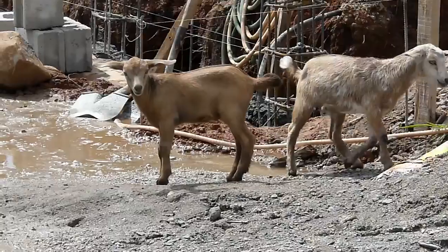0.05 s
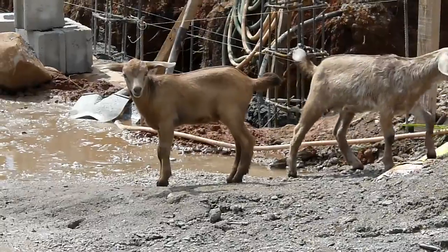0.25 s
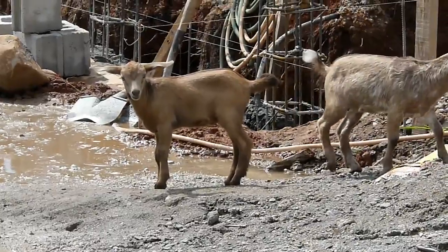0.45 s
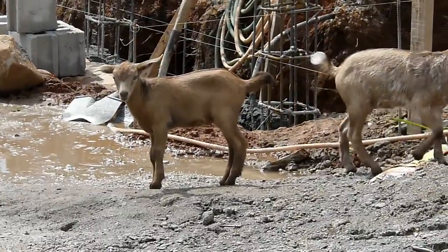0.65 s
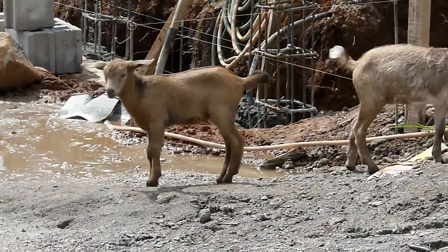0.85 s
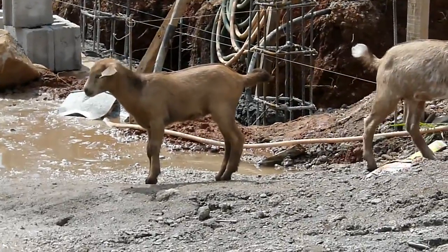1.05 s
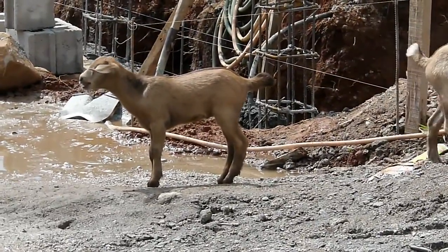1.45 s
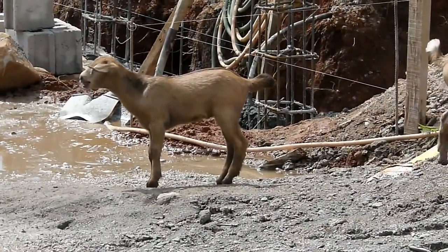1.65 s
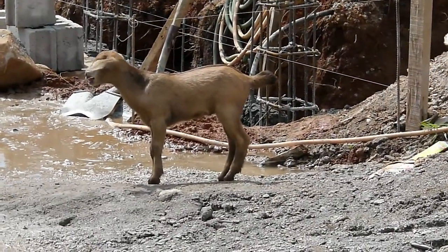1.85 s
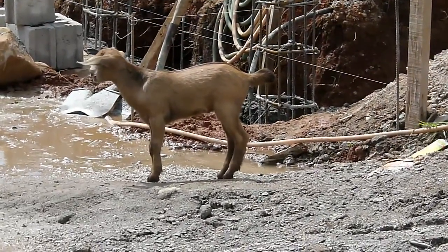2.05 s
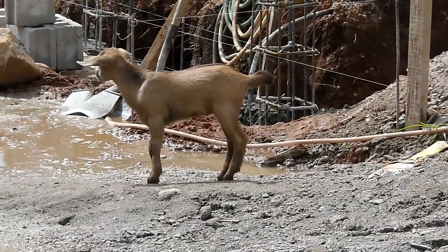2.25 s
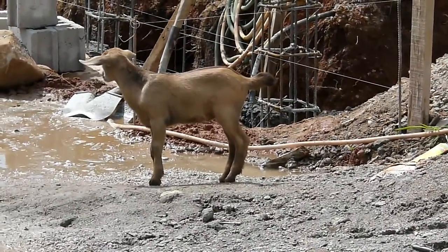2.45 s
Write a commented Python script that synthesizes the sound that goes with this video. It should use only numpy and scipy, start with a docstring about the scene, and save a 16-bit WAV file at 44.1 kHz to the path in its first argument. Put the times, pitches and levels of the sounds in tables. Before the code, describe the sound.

A young goat gives one high, quavering bleat from about 1.3 to 2.2 seconds, slightly left, with a short echo and a falling end. Earlier, metal squeals faintly until 0.5 seconds, and a small distant engine putters, peaking near 0.8 seconds, then fading. Hooves crunch softly on gravel around 1 second. Faint machine whines, building site din and hiss lie underneath, with light wind bumping the microphone.

```python
"""A building site. A young goat gives one quavering bleat: vocal-fold harmonics and rasp through
throat formants, in short pitch arches, about ten a second, thrown back by a wall to the left.
A small engine some way off putters with exhaust pulses and fades. Rubbing metal squeals and dies away,
machines whine faintly and a second goat's hooves crunch on gravel.
Light wind bumps against the microphone over machine din and hiss."""
import sys
import numpy as np
from scipy import signal
from scipy.fft import rfft, irfft, next_fast_len
from scipy.io import wavfile
from scipy.ndimage import map_coordinates

SR = 44100
rng = np.random.default_rng(int(sys.argv[2]) if len(sys.argv) > 2 else 0)


def to_wav(s):
    """Save 16-bit WAV."""
    ch = np.atleast_2d(s).T  # columns
    pcm = np.round(np.clip(ch, -1, 1) * 32767)  # PCM
    wavfile.write(sys.argv[1], SR, pcm.astype(np.int16))


N = 110250
START_S = .169

# Bleat arches. Each row: crest time in seconds, pitch in Hz, climb as a share of pitch, rise and fall
# in seconds, level in dB, six formant settings as in LAST_FORMANTS, rasp in dB.
SYLLABLES = [(1.324, 599, 0.0049, .024, 0.015, -50.5, 3380, 7.5, -8, -13, 8000, 0, -27),
             (1.432, 615.3, 0.056, 0.031, 0.015, -39, 3600, 10.5, -6.5, -5, 8150, 11, -11),
             (1.520, 632.4, 0.059, 0.038, .02, -38, 3570, 16.5, -2.5, -2.5, 8400, 9, -14.5),
             (1.611, 637, 0.05, .034, 0.021, -39.5, 3550, 18.5, 9, 0.5, 9300, 2.5, -21),
             (1.705, 643, .037, .042, 0.017, -38, 3540, 18, 9, 2.5, 11600, 7, -15.5),
             (1.796, 646.5, .03, .043, .015, -39.5, 3610, 17.5, 7, -2, 9600, 1, -18.5),
             (1.883, 648.5, 0.006, .036, 0.014, -42.5, 3610, 22, 10, 0.5, 9600, 1, -30),
             (1.981, 648.2, 0.0065, 0.043, 0.018, -42, 3630, 24.5, 10.5, 3, 11200, 3, -36),
             (2.075, 641.8, 0.0123, 0.047, 0.021, -42.5, 4170, 14.5, 3, -0.5, 6760, 1, -32)]
# Falling last syllable. Each row: time in seconds, pitch in Hz, level in dB.
LAST_SYLLABLE = [(2.128, 608, -66), (2.148, 620, -46), (2.165, 597, -43), (2.177, 562, -44.5),
                 (2.19, 520, -58)]
# In order: main formant in Hz, its gain in dB, upper formant gain in dB, treble shelf in dB,
# top formant in Hz, its gain in dB. Mouth opening scales the three formant gains.
LAST_FORMANTS = (3750, 9, 5.5, -6, 8200, 2)
# Engine speed. Each row: time in seconds, firing rate in Hz.
FIRING_RATE_HZ = [(0, 40.25), (.8, 40.35), (1.4, 40.35), (2.1, 40.9), (2.5, 40.9)]
# Drone harmonics. Each row: multiple of the firing rate, level in dB.
ENGINE_ORDERS = [(4, -11), (7, -7), (8, 2), (9, -5), (10, .5), (11, -2), (12, -2), (13, 3), (14, -5),
                 (15, -6), (16, -4), (19, -8), (20, -7), (21, -6), (22, -3), (23, -7), (24, -8)]
# Rubbing metal. Each row: frequency in Hz, level in dB.
SQUEAL_PARTIALS = [(2250, -11), (2412, 0), (3515, -8), (4479, -10), (4610, -12)]
# Machine tones. Each row: centre and half-width in seconds, frequency in Hz, level in dB.
WHINES = [(0.763, 0.12, 836.4, -42.5), (0.985, 0.05, 649.5, -40), (1.013, 0.077, 894, -42.5),
          (1.25, 0.038, 936, -44.5), (1.972, 0.027, 837, -43.5), (2.253, 0.13, 837, -49.5)]
# Hoof steps. Each row: centre and half-width in seconds, level in dB.
STEPS = [(.9, .05, -58), (1.05, .09, -55)]
# Wind bumps. Each row: centre and half-width in seconds, level in dB, lower and upper edge in Hz.
GUSTS = [(0.669, 0.037, -38, 131, 220), (1.059, 0.039, -32, 163, 350), (1.145, 0.021, -29.5, 162, 336),
         (1.294, 0.042, -33.5, 103, 274), (1.44, 0.058, -38, 166, 300), (1.541, 0.013, -31.5, 130, 270),
         (1.81, 0.04, -43, 160, 282), (2.036, 0.05, -37, 142, 240), (2.073, 0.045, -35, 156, 543),
         (2.143, 0.019, -32.5, 97, 360), (2.38, 0.016, -42, 91, 222)]

# Layer envelopes. Each row: time in seconds, level in dB.
EXHAUST_DB = [(.17, -49), (.5, -48), (.6, -45), (.72, -44), (.82, -38), (.92, -44), (1.05, -46), (1.3, -52),
              (1.6, -55), (2.5, -56)]
PUFF_DB = [(.17, -55), (.55, -52.5), (.8, -42.5), (.95, -57), (1.3, -50), (2.5, -55)]
DRONE_DB = [(.17, -41), (.4, -41), (.55, -43.5), (.85, -39.5), (1.1, -41), (1.4, -47.5), (1.9, -50.5),
            (2.5, -49.5)]
RUMBLE_DB = [(.17, -52.5), (.7, -59), (.92, -66), (1.1, -44), (1.7, -41.5), (2.1, -44.5), (2.28, -57),
             (2.5, -50)]
DIN_DB = [(.17, -42), (.36, -41), (.5, -40.5), (.69, -41), (.86, -40.5), (1.21, -45.5), (1.37, -48.5),
          (1.5, -41.5), (1.98, -49.5), (2.5, -44)]
HISS_DB = [(.17, -47.5), (.6, -48), (.9, -48.5), (1.15, -48), (1.35, -50), (2.3, -47.5), (2.5, -47.5)]

# Spectral shapes. Each row: frequency in Hz, gain in dB.
THROAT_EQ = [(300, -37), (630, -56), (1270, -9.5), (1650, 4), (1900, 1), (2200, -8.5), (2520, -3),
             (2850, -21), (3150, -4), (3800, -0.5), (4450, 1.5), (5100, -5), (5780, 5), (6400, -10.5),
             (7000, -6), (8300, -8), (10000, -12), (12000, -27.5), (16000, -56)]
WALL_EQ = [(500, -21), (1900, -27), (2550, -9), (3200, -16), (3800, -10.5), (4450, 0), (5200, 2),
           (5800, -3.5), (7500, -5), (9500, 1.5), (14000, -12)]
EXHAUST_EQ = [(60, -28), (200, -6), (450, 4), (900, 2), (1500, -4.5), (2100, -15), (2800, -26), (6000, -45),
              (15000, -50)]
PUFF_EQ = [(100, -35), (400, 8.5), (800, 11.5), (1400, 1.5), (2200, -30), (5000, -44), (15000, -47)]
GRAVEL_EQ = [(2000, -25), (6000, -4), (11000, 0), (15000, -5)]
RUMBLE_EQ = [(30, -15), (80, -3), (140, -0.5), (250, -2.5), (500, -11), (2000, -43)]
DIN_EQ = [(30, -48), (70, -13), (130, -5), (300, 0.5), (550, 0), (900, -2.5), (1400, -3), (2200, -9),
          (4000, -21.5), (15000, -27.5)]
HISS_EQ = [(500, -14), (1800, -10.5), (3900, -6), (7000, -13.5), (11900, -18), (15500, -57)]
SCUFF_EQ = [(2500, -18), (4500, 12), (6000, 6), (8000, -14), (14000, -13)]

# Directions. Each row: frequency in Hz, left boost and equal right cut in dB.
GOAT_PAN = [(1000, -1), (1900, 1), (3200, 3.5), (4200, 2.5), (8000, 1)]
WALL_PAN = [(2000, 7.5), (4500, 6.5), (8000, 2)]
FAR_WALL_PAN = [(1000, 1.8), (8000, 7.5)]
ENGINE_PAN = [(200, 0.39), (1000, -0.67)]
# Late echoes. Each row: delay in seconds, gain in dB.
FAR_WALLS = [(.073, -17), (.081, -20)]
# Diffuse tail. Each row: frequency in Hz, time to fall 60 dB in seconds.
SITE_T60_S = [(200, .2), (2500, .3), (3800, 0.62), (5500, 0.44), (12000, 0.085)]
# Noise field of the open site. Each row: frequency in Hz, left-right correlation.
COHERENCE = [(60, 0.6), (180, 1), (550, 1), (1650, 0.36), (5000, 0.084), (15000, -0.66)]


def amp(db):
    """Decibels to gain."""
    return 10 ** (np.asarray(db) / 20)


def unit(x):
    """Scale to rms 1."""
    return x / np.sqrt(np.mean(x ** 2) + 1e-20)


def clock():
    """Sample times in seconds."""
    return np.arange(N) / SR


def along(points, hz):
    """Interpolate (Hz, value) points on a log axis."""
    f, v = np.transpose(points)
    return np.interp(np.log(hz + 1), np.log(f + 1), v)


def curve(rows):
    """Interpolate (s, value) points at every sample."""
    return np.interp(clock(), *np.transpose(rows))


def bell(x, centre, width):
    """Gaussian of height 1; 1/e at centre +- width."""
    return np.exp(-((x - centre) / width) ** 2)


def wobble(rate_hz):
    """Smooth random curve, rate_hz knots a second."""
    return map_coordinates(rng.standard_normal(int(N * rate_hz / SR) + 4), [clock() * rate_hz])


def filtered(x, response):
    """Apply a complex frequency response."""
    m = next_fast_len(N + SR // 2)
    return irfft(rfft(x, m) * response(np.fft.rfftfreq(m, 1 / SR)), m)[..., :N]


def shaped(x, eq):
    """Apply a spectral shape at zero phase."""
    return filtered(x, lambda hz: amp(along(eq, hz)))


def impulse(eq, size=2048):
    """Minimum-phase impulse response of a spectral shape."""
    cepstrum = irfft(np.log(amp(along(eq, np.fft.rfftfreq(size, 1 / SR)))))
    cepstrum[1:size // 2] *= 2
    cepstrum[size // 2 + 1:] = 0
    return irfft(np.exp(rfft(cepstrum)))


def site_noise(eq):
    """Stereo noise of rms 1 with the site's coherence."""
    def mid_side(hz):
        angle = np.arccos(np.clip(along(COHERENCE, hz), -1, 1)) / 2
        return amp(along(eq, hz)) * [np.cos(angle), np.sin(angle)]
    mid, side = filtered(rng.standard_normal((2, N)), mid_side)
    return unit(np.array([mid + side, mid - side]))


def placed(x, pan, left_lead_s=0, delay_s=0):
    """Direction from level and arrival time at each ear."""
    ear = np.array([[1], [-1]])
    arrival_s = delay_s - ear * left_lead_s / 2
    return filtered(x, lambda hz: amp(ear * along(pan, hz)) * np.exp(-2j * np.pi * hz * arrival_s))


def goat(scoop=.15, sag=.1424, rise_db=6.6, fall_db=6):
    """Each syllable scoops up to a crest, then sags and breaks; the last slides down."""
    t, bleat = clock(), np.zeros(N)
    for crest_s, hz, climb, rise_s, fall_s, db, *formants, rasp_db in SYLLABLES:
        before = np.clip((crest_s - t) / rise_s, 0, 4)
        after = np.clip((t - crest_s) / fall_s, 0, 4)
        droop = climb * before + scoop * before ** 7 + sag * after ** 1.66
        pitch_hz = hz * (1 - np.minimum(droop, .3))
        effort_db = -rise_db * (before + before ** 6) / 2 - fall_db * (after + after ** 3) / 2
        bleat += amp(db) * voice(pitch_hz, effort_db, np.minimum(2 * after, 1), rasp_db, formants)
    times_s, hz, db = np.transpose(LAST_SYLLABLE)
    effort_db = np.interp(t, times_s, db - db.max(), left=-120, right=-120)
    last = voice(np.interp(t, times_s, hz), effort_db, breaking=.3, rasp_db=-11, formants=LAST_FORMANTS)
    return bleat + amp(db.max()) * last


def voice(pitch_hz, effort_db, breaking, rasp_db, formants, harmonics=24, dulling=1.74):
    """Vocal-fold harmonics plus rasp gated once a cycle; less effort is duller, breaking is rougher."""
    on = effort_db > -40
    wander = .004 * wobble(110)
    jitter = (.0034 + .012 * breaking) * wobble(700)
    phase = 2 * np.pi * np.cumsum(pitch_hz * (1 + wander + jitter)) / SR
    k = np.arange(1, harmonics + 1)[:, None]
    hz = k * pitch_hz[on]
    opening = amp(.3 * effort_db[on])
    tilt_db = dulling * effort_db[on] * np.clip(hz / 1800 - 1, 0, 1)
    gain = amp(throat_db(hz, opening, *formants) + tilt_db)
    tone = np.zeros(N)
    tone[on] = np.sum(gain * np.cos(k * phase[on] + rng.normal(0, .93, (harmonics, 1))), axis=0)
    breath = rng.standard_normal(N) * (1 + np.cos(phase))
    rasp = filtered(breath, lambda f: amp(throat_db(f, .94, *formants))) * np.sqrt(SR / pitch_hz.max()) / 2
    rasp *= amp(rasp_db + 9 * breaking + dulling * effort_db / 2)
    shimmer_db = .75 * wobble(340)
    return amp(effort_db + shimmer_db) * (tone + rasp)


def throat_db(hz, opening, main_hz, main_db, upper_db, treble_db, top_hz, top_db):
    """Throat and mouth gain; the formants sharpen as the mouth opens."""
    peaks_db = (main_db * bell(hz, main_hz, 683)
                + upper_db * bell(hz, 5240, 590)
                + top_db * bell(hz, top_hz, 570))
    shelf_db = treble_db * (1 + np.tanh((hz - 6740) / 1000)) / 2
    return along(THROAT_EQ, hz) + opening * peaks_db + shelf_db


def echoes(x, diffuse_db=-8.5):
    """One strong wall to the left, two farther ones and a short diffuse tail."""
    wall = placed(shaped(x, WALL_EQ), WALL_PAN, left_lead_s=40e-6, delay_s=.033)
    far = sum(amp(db) * placed(x, FAR_WALL_PAN, delay_s=s) for s, db in FAR_WALLS)
    hz, t, spectra = signal.stft(rng.standard_normal((2, SR // 2)), SR, nperseg=256)
    decay = amp(-60 * t / along(SITE_T60_S, hz)[:, None])
    tail = signal.istft(spectra * decay, SR, nperseg=256)[1]
    diffuse = signal.fftconvolve(x[None], tail / np.linalg.norm(tail[0]), axes=1)[:, :N]
    return wall + far + amp(diffuse_db) * diffuse


def engine(firing_at_s=.8049, scatter_db=1.4, waver_db=2.8):
    """Exhaust pulses and their puffs arrive directly; scattered sound merges into a wavering drone."""
    cycles = np.cumsum(curve(FIRING_RATE_HZ)) / SR
    cycles -= cycles[round(firing_at_s * SR)]
    firings = np.diff(np.floor(cycles), prepend=np.floor(cycles[0]))
    firings *= amp(scatter_db * wobble(40.95))
    pulses = unit(np.convolve(-firings, impulse(EXHAUST_EQ))[:N])
    puffs = unit((1 + .23 * np.cos(2 * np.pi * cycles)) * site_noise(PUFF_EQ))
    drone = np.zeros((2, N))
    for order, db in ENGINE_ORDERS:
        gain = amp(db + waver_db * wobble(8.17))
        phase = 2 * np.pi * (order * cycles + rng.random())
        spread_rad = rng.normal(0, .35, (2, 1))
        drift_rad = .33 * wobble(10.86)
        drone += gain * np.cos(phase + spread_rad + drift_rad)
    direct = amp(curve(EXHAUST_DB)) * pulses + amp(curve(PUFF_DB)) * puffs
    return direct + amp(curve(DRONE_DB)) * unit(drone)


def squeal(level_db=-47, ramp_s=.025, fade_db_per_s=38, end_s=.48):
    """Rubbing metal: unsteady partials that swell, fade and stop."""
    t = clock()
    gate = np.clip(np.minimum(t - START_S, end_s - t) / ramp_s, 0, 1)
    partials = sum(amp(db + 3 * wobble(30)) * np.sin(2 * np.pi * hz * t + .31 * wobble(74.4))
                   for hz, db in SQUEAL_PARTIALS)
    return gate * amp(level_db - fade_db_per_s * (t - START_S)) * partials


def whines(drift_rad=.6):
    """Narrow, unsteady machine tones that swell and fade."""
    t = clock()
    return sum(amp(db) * bell(t, at_s, width_s) * np.sin(2 * np.pi * hz * t + drift_rad * wobble(39.85))
               for at_s, width_s, hz, db in WHINES)


def hooves(grains_per_s=1500):
    """Each step crunches a faint cloud of gravel grains."""
    grains = rng.standard_normal((2, N)) * (rng.random(N) < grains_per_s / SR)
    envelope = sum(amp(db) * bell(clock(), at_s, width_s) for at_s, width_s, db in STEPS)
    return envelope * unit(shaped(grains, GRAVEL_EQ))


def wind():
    """Low rumble and short bumps; the two microphone ports share part of each bump."""
    rumble_gain = amp(curve(RUMBLE_DB) + 1.2 * wobble(20))
    out = rumble_gain * unit(shaped(rng.standard_normal((2, N)), RUMBLE_EQ))
    for at_s, width_s, db, low_hz, high_hz in GUSTS:
        def band(hz):
            return (hz / low_hz) ** 3 / np.sqrt((1 + (hz / low_hz) ** 6) * (1 + (hz / high_hz) ** 5))
        eddies = rng.standard_normal((2, N)) + .5 * rng.standard_normal(N)
        out += amp(db) * bell(clock(), at_s, width_s) * unit(filtered(eddies, band))
    return out


def background(scuff_s=1.24, scuff_width_s=.043, scuff_db=-46.5):
    """Machine din, airy hiss and one soft scuff."""
    din = amp(curve(DIN_DB) + .21 * wobble(13.94)) * site_noise(DIN_EQ)
    hiss = amp(curve(HISS_DB) + .55 * wobble(20)) * site_noise(HISS_EQ)
    scuff = amp(scuff_db) * bell(clock(), scuff_s, scuff_width_s) * site_noise(SCUFF_EQ)
    return din + hiss + scuff


def scene():
    """Goat left of centre, the site around it."""
    bleat = goat()
    call = placed(bleat, GOAT_PAN, left_lead_s=26e-6) + echoes(bleat)
    putter = placed(engine(), ENGINE_PAN, left_lead_s=20e-6)
    return call + putter + squeal() + whines() + hooves() + background() + wind()


def record(dry, low_cut_hz=110, top_hz=15750):
    """Silence until START_S, then a low cut and a steep band limit."""
    def band(hz):
        low_cut = (1j * hz / (low_cut_hz + 1j * hz)) ** 2
        return low_cut / (1 + (hz / top_hz) ** 200)
    return filtered(dry * (clock() > START_S), band)


dry = scene()
out = record(dry)
to_wav(out)
```